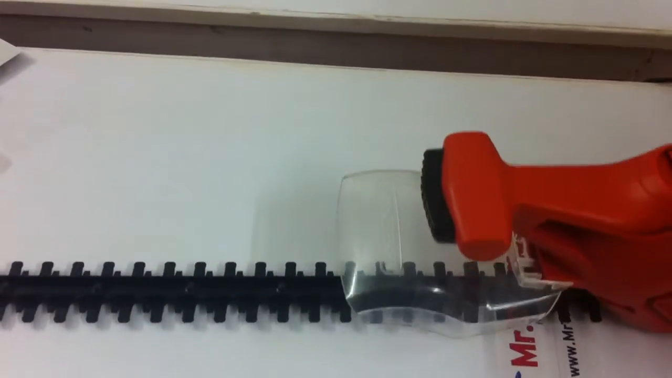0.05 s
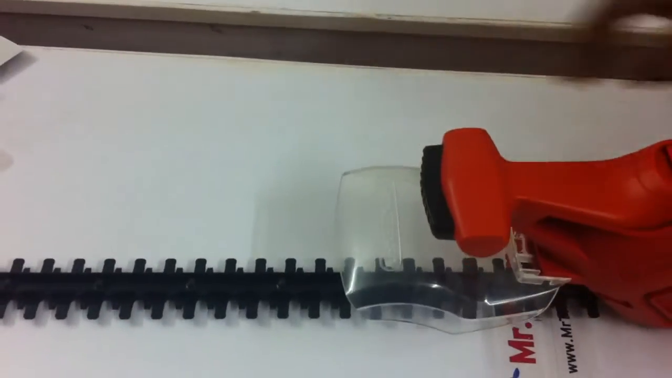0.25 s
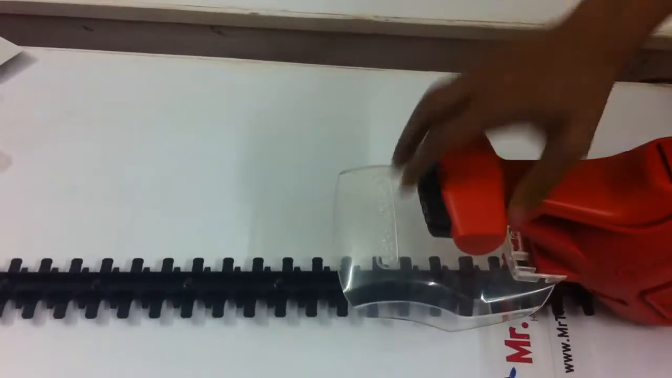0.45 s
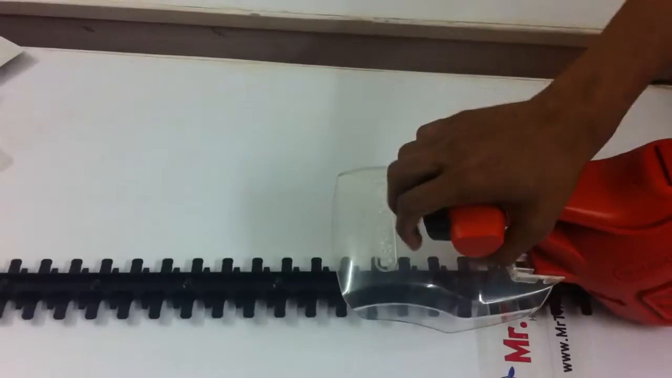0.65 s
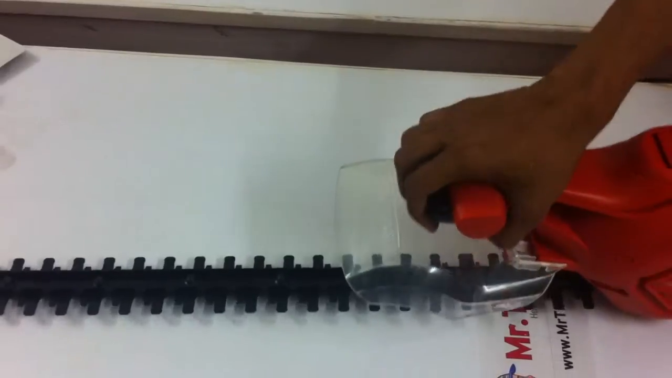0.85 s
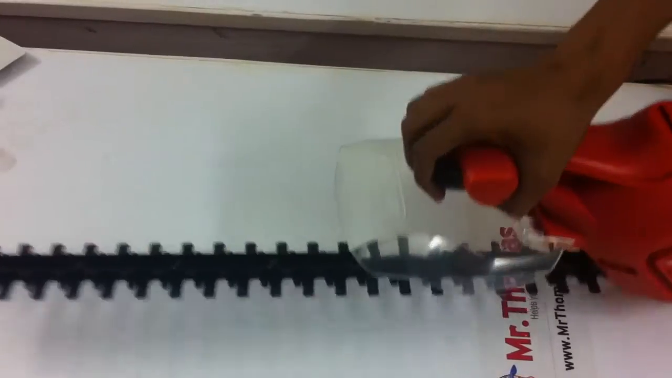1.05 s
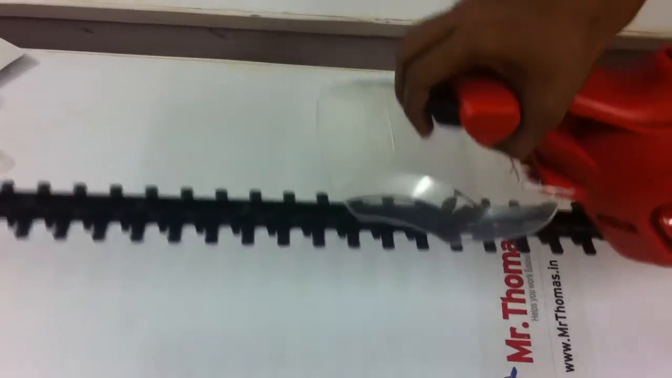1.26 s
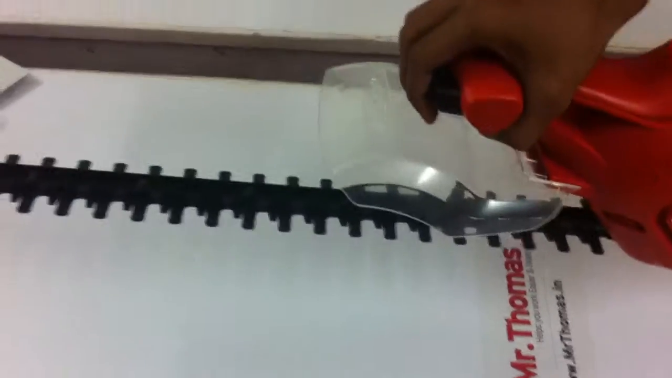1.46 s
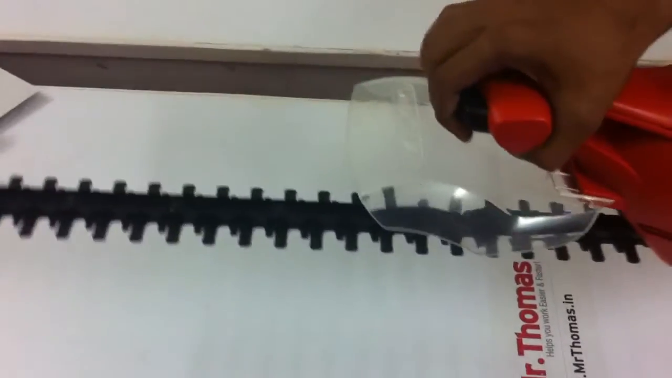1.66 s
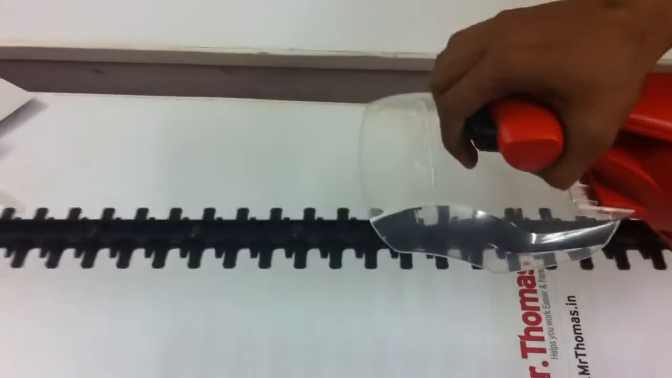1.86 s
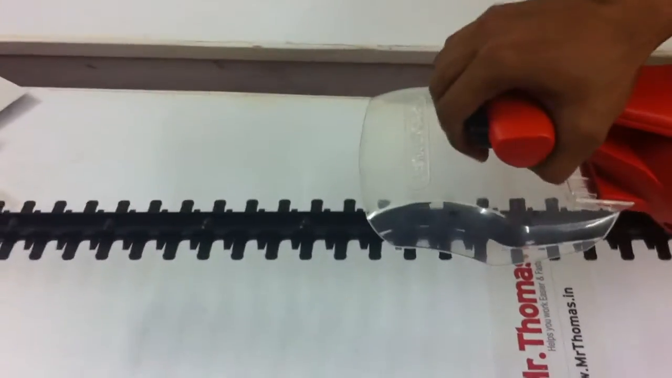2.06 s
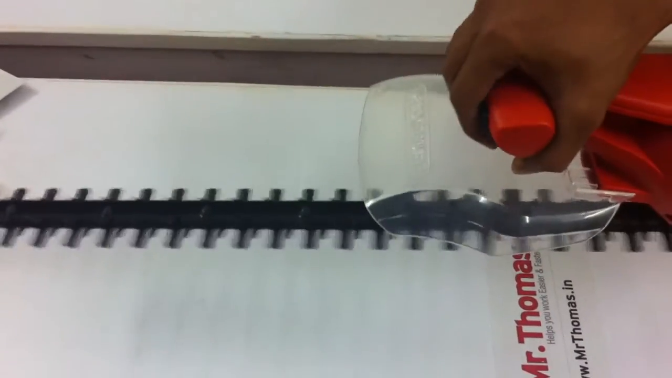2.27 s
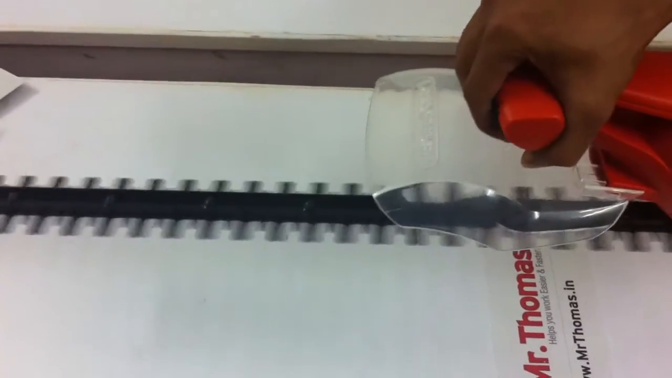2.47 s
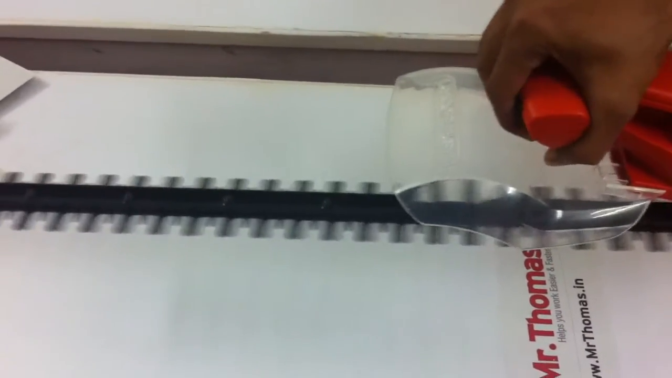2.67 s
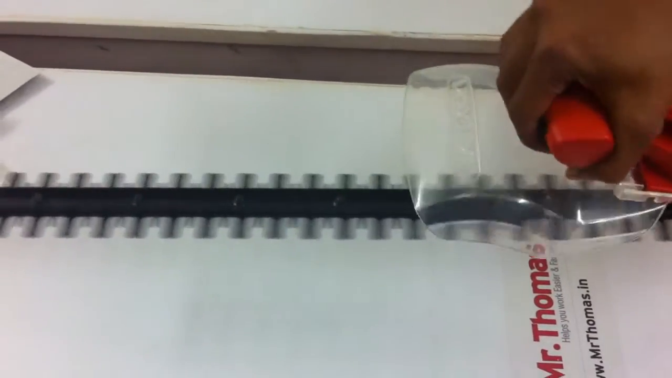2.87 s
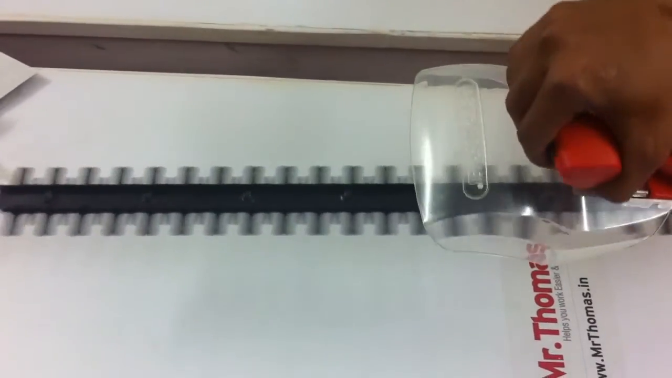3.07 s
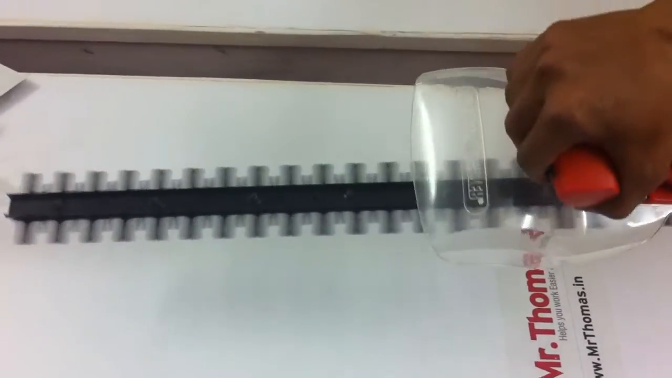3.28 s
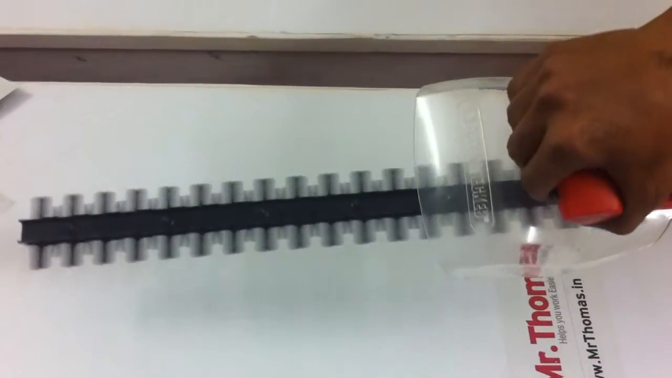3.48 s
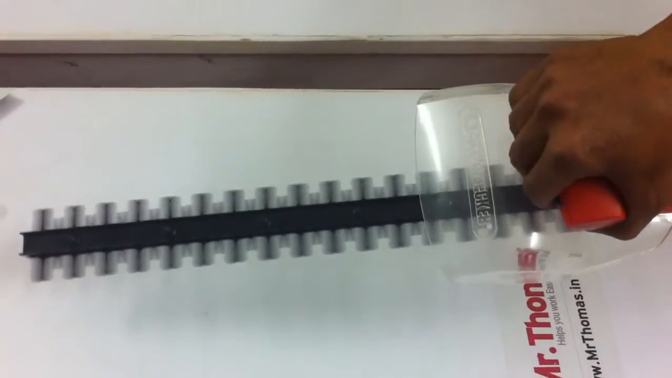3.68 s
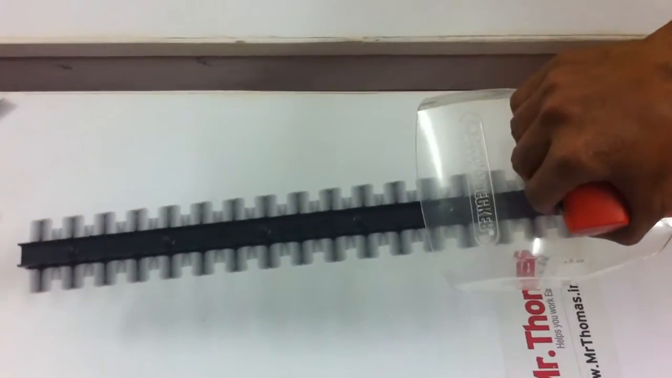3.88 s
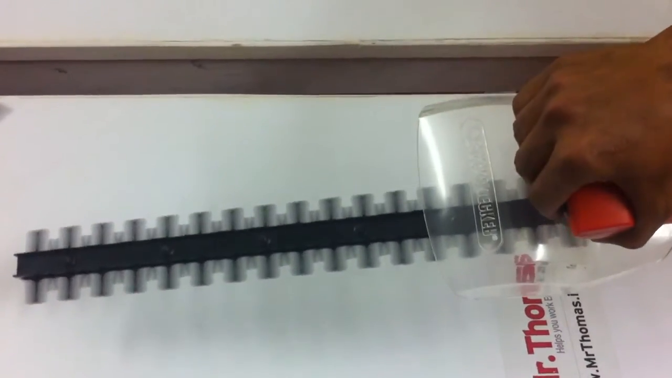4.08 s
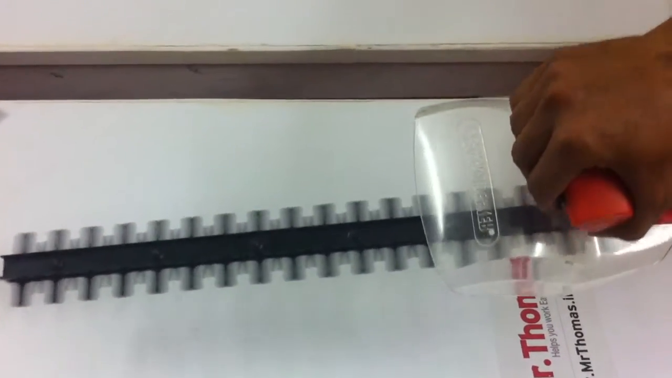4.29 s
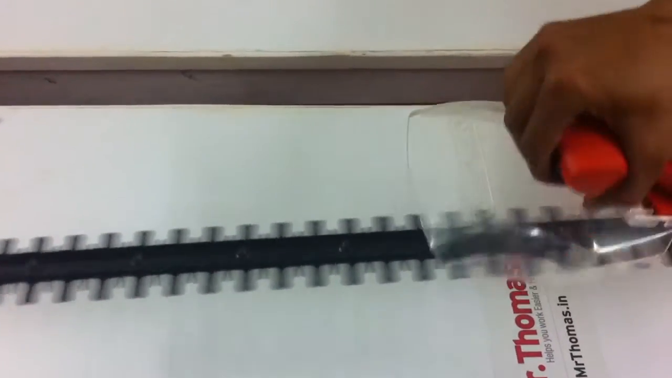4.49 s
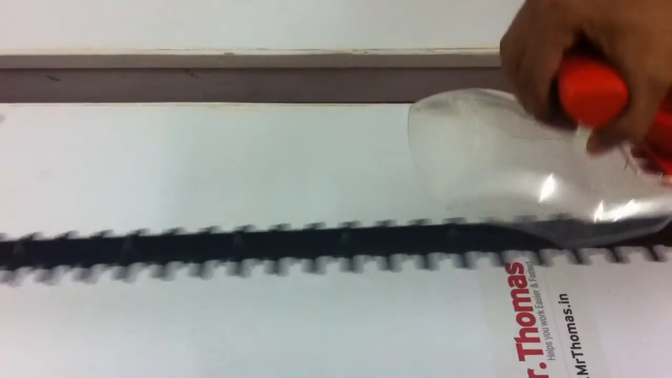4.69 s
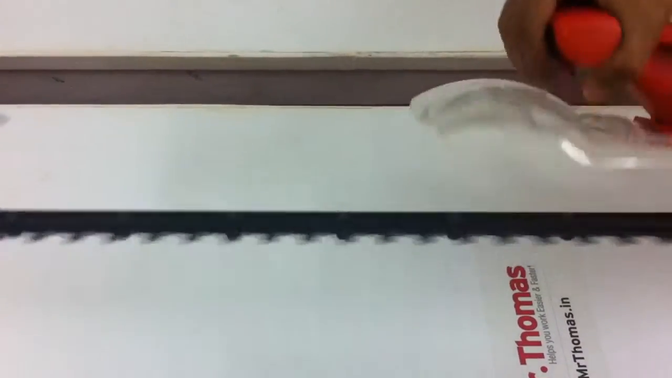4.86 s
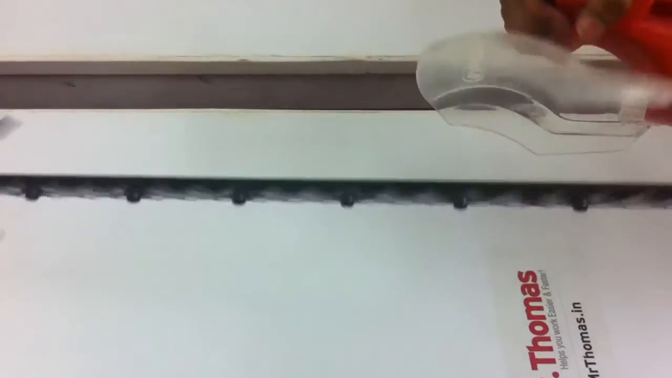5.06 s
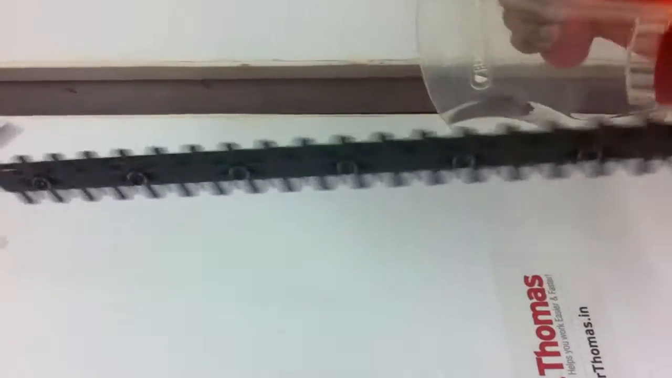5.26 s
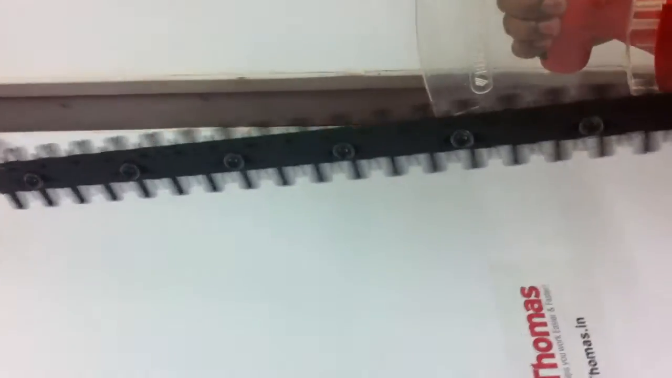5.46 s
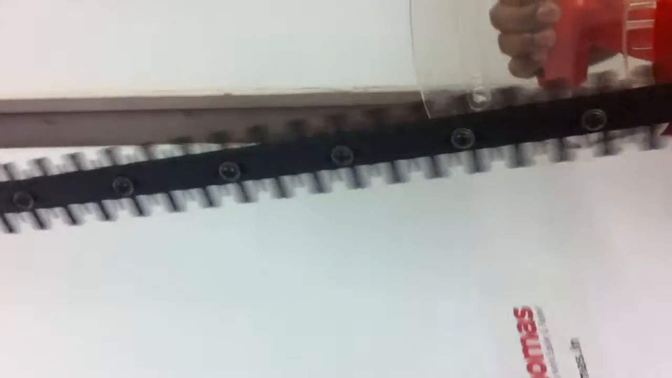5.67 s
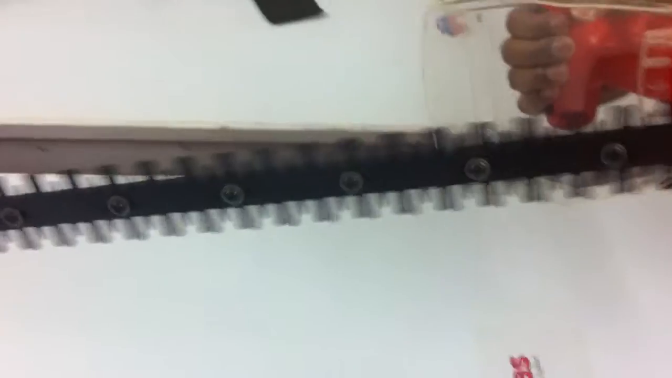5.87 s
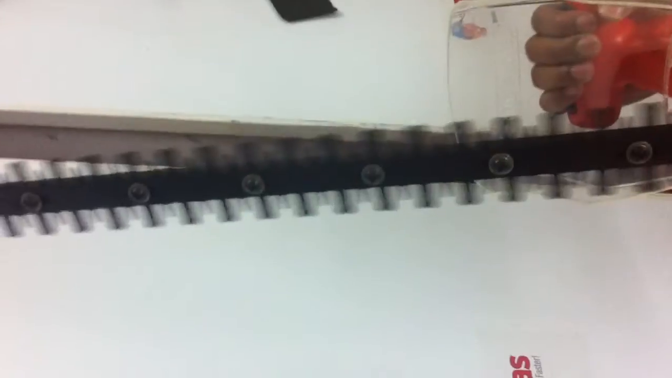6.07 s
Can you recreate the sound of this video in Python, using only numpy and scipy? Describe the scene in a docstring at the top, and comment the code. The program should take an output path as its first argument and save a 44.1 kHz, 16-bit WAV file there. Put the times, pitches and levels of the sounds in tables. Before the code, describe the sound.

Knocks of handling a plastic-bodied power tool, a sharp switch click, then an electric hedge trimmer whines up and runs in a loud, rattling metallic buzz.

```python
"""Electric hedge trimmer in a bare room

Over a dull background rush, a hedge trimmer is picked up from a table with knocks on its shell, and switched on.
Its motor whines up to speed and runs without load: the shaft hums, and lines at multiples of its speed flare.
Filtered noise gives the roar of the fan; random tooth contacts ring the gears, the housing and the blades.
The balance shifts as the tool is turned about; a delayed copy stands for the table's reflection."""
import sys
import numpy as np
from scipy import signal
from scipy.fft import rfft, irfft
from scipy.io import wavfile
from scipy.ndimage import uniform_filter1d, map_coordinates

SR = 44100
rng = np.random.default_rng(int(sys.argv[2]) if len(sys.argv) > 2 else 0)


def dump_mix(stems):
    """Bounce the given channels to the path in sys.argv[1] as a 16-bit WAV at rate SR."""
    frames = np.atleast_2d(stems).T  # one column per channel
    limited = np.clip(frames, -1, 1)  # hard clip at full scale
    pcm = np.round(limited * 32767).astype(np.int16)
    wavfile.write(sys.argv[1], SR, pcm)


N = 270333
TIME = np.arange(N) / SR   # s
START_S, FULL_SPEED_HZ = 2.3442, 449.4   # the motor starts from rest; its free speed in turns per second


def from_db(db):
    """Decibels to amplitude gain, by the definition of the level."""
    return 10 ** (np.asarray(db) / 20)


def rms_one(x):
    """Normalization by the root mean square."""
    return x / np.sqrt(np.mean(x ** 2) + 1e-20)


def in_time(rows):
    """Linear interpolation of a (time, value) curve, sample by sample."""
    times, values = np.transpose(rows)
    return np.interp(TIME, times, values)


def bell(s, half_s):
    """Gaussian rise to 1 at time s, and fall; half_s is its standard deviation."""
    return np.exp(-((TIME - s) / half_s) ** 2 / 2)


def drift(rate):
    """Band-limited random process: splines through random knots, rate of them a second, of spread 1."""
    knots = rng.standard_normal(4096)
    coarse = TIME[::24]
    smooth = map_coordinates(knots, [coarse * rate], order=3, mode="wrap")
    return np.interp(TIME, coarse, rms_one(smooth))


def coloured(x, spectrum):
    """Minimum-phase filtering: the cepstrum of the wanted spectrum, folded causal; unit power gain."""
    size = 8192
    hz, db = np.transpose(spectrum)
    bins_hz = np.arange(size // 2 + 1) * SR / size
    gain = rms_one(from_db(np.interp(np.log(bins_hz + 1), np.log(hz), db)))
    cepstrum = irfft(np.log(gain))
    cepstrum[1:size // 2] *= 2
    cepstrum[size // 2 + 1:] = 0
    response = irfft(np.exp(rfft(cepstrum)))
    return signal.oaconvolve(x, response)[:N]


def resonance(x, hz, width_hz):
    """Damped oscillator as a two-pole filter, with gain 1 on top."""
    r = np.exp(-np.pi * width_hz / SR)
    zeros = np.array([1, 0, -1]) * (1 - r * r) / 2
    poles = [1, -2 * r * np.cos(2 * np.pi * hz / SR), r * r]
    return signal.lfilter(zeros, poles, x)


def modes(x, rows):
    """Modal superposition: each mode, two resonances deep, rings to its own level; the sum has rms 1."""
    total = 0
    for hz, width, db in rows:
        ring = resonance(resonance(x, hz, width), hz, width * 2)
        total = total + from_db(db) * rms_one(ring)
    return rms_one(total)


def room(x):
    """Diffuse reverberation: exponentially decaying noise of unit energy, whose treble dies sooner."""
    t60_s, treble_share = 0.4, 0.58
    t = TIME[:SR]
    white = rng.standard_normal(SR)
    dull = signal.sosfilt(signal.butter(1, 5000, fs=SR, output="sos"), white)
    low_tail = dull * from_db(-60 * t / t60_s)
    high_tail = (white - dull) * from_db(-60 * t / (treble_share * t60_s))
    tail = (low_tail + high_tail) * (t > .004)   # starts after 4 ms
    return signal.fftconvolve(x, tail / np.linalg.norm(tail))[:N]


def ambience(level_db, hum_db, hum_hz, hum_width_hz):
    """Stationary noise: a dull steady rush, with a narrow band of noise as a soft drone."""
    # spectrum of the room's rush: (frequency [Hz], relative density [dB per Hz])
    rush_spectrum = [(15, -50), (25, -31), (33, -40), (70, -26), (89, -28.5), (120, -4.5), (263, 1.5),
                     (293, -2), (326, -0.5), (476, -7.5), (624, -6), (796, -12.5), (1100, -8),
                     (2760, -25.5), (16000, -44.5)]
    rush = rms_one(coloured(rng.standard_normal(N), rush_spectrum))
    drone = rms_one(resonance(rng.standard_normal(N), hum_hz, hum_width_hz))
    return from_db(level_db) * rush + from_db(hum_db) * drone


def table():
    """Free vibration: low modes of the table top swell and decay exponentially after the first knock."""
    # boom of the table top: (frequency [Hz], initial level [dB], t60 [s])
    table_modes = [(85, -52, 0.43), (125, -41.5, 0.41), (167.5, -37, .45), (371, -36, 0.2)]
    swell = 1 - np.exp(-TIME / 0.0036)
    boom = 0
    for hz, db, t60 in table_modes:
        boom = boom + from_db(db - 60 * TIME / t60) * np.sin(2 * np.pi * hz * TIME)
    return swell * boom


def knocks(rows, t60, wet):
    """Impact excitation: short cracks of decaying noise ring the shell's modes and the room."""
    # colour of the crack itself: (frequency [Hz], relative density [dB per Hz])
    crack_spectrum = [(150, -22), (600, -6), (1300, -2), (2400, -5), (3500, -2), (5000, -5), (6500, -3),
                      (9000, -7), (12000, -5), (16000, 0.5)]
    # modes of the plastic shell: (frequency [Hz], width [Hz], gain [dB], raised 0.5 dB below)
    shell_modes = [(2280, 350, -18), (3500, 200, -2), (3900, 130, 4), (4520, 150, 7), (5440, 300, -4),
                   (7200, 300, -5), (7700, 250, -5)]
    direct = np.zeros(N)
    age = TIME[:SR // 5]
    for s, db, bright_hz in rows:
        crack = rng.standard_normal(len(age)) * from_db(db - 60 * age / t60)
        softened = signal.lfilter(*signal.butter(1, bright_hz, fs=SR), crack)
        direct[round(s * SR) + np.arange(len(age))] += softened
    ringing = sum(from_db(db + 0.5) * resonance(direct, hz, width) for hz, width, db in shell_modes)
    return coloured(direct + wet * room(direct), crack_spectrum) + ringing


def handling():
    """Direct and reverberant sound: the hand sets more of the room ringing than the small switch does."""
    # knocks and brushes of the hand: (time [s], crack level before filtering [dB], contact brightness [Hz])
    hand_knocks = [(0.001, -32, 4000), (0.04, -42, 3500), (0.11, -51, 9000), (0.5382, -48, 13000),
                   (0.6472, -33.5, 4500), (0.659, -41, 4000), (0.677, -35, 4000), (0.695, -47, 4000),
                   (0.712, -47, 4000), (1.6526, -50, 4000), (1.9944, -49, 5000)]
    # safety catch and switch: (time [s], crack level before filtering [dB], contact brightness [Hz])
    switch_clicks = [(2.1687, -34.5, 12000), (2.2164, -36.5, 4500), (2.349, -27.5, 14000),
                     (2.354, -19.2, 14000)]
    return knocks(hand_knocks, t60=.026, wet=1.15) + knocks(switch_clicks, t60=0.023, wet=0.51)


def motor_speed():
    """Exponential approach: the gap to the free speed (turns per s) closes quickly, then creeps."""
    spin_up_s, creep_s, creep_share = .1045, .308, .339
    age = np.maximum(TIME - START_S, 0)
    gap = (1 - creep_share) * np.exp(-age / spin_up_s) + creep_share * np.exp(-age / creep_s)
    return FULL_SPEED_HZ * (1 - gap) + 1e-3


def torque(speed):
    """Linear motor law: the share of the stall torque falls to nothing at the free speed."""
    return np.clip(1 - speed / FULL_SPEED_HZ, 0, 1)


def growth(speed, knee, power):
    """Power law: level in dB that grows with the speed up to a knee (turns per s), then holds."""
    return 20 * power * np.log10(np.minimum(speed / knee, 1))


def contacts(speed, stroke, per_turn, spread_db, throb, rub):
    """Random impacts: teeth tap at a rate that peaks once per stroke cycle, over a smooth rubbing."""
    push = np.maximum(1 + throb * np.cos(stroke), 0)   # strongest as the blades reverse
    born = rng.random(N) < per_turn * speed * push / SR
    sizes = from_db(spread_db * np.minimum(rng.exponential(1, N), 3)) * rng.choice([-1, 1], N)
    rubbing = rms_one(rng.standard_normal(N) * np.sqrt(push * speed))
    return rms_one(born * sizes) + rub * rubbing


def part(force, spectrum, level_db):
    """Source and filter: a part colours the force on it, evened in level, and wavers a little on its own."""
    sound = coloured(force, spectrum)
    power = np.abs(uniform_filter1d(sound ** 2, size=6000))
    even = sound / np.sqrt(power + 1e-4)   # about rms 1 at any speed
    return from_db(level_db + 0.46 * drift(40)) * even


def fan_rush(speed, roll):
    """Turbulence noise: the cooling fan's rush grows steeply with the speed."""
    # rush of the cooling fan: (frequency [Hz], relative density [dB per Hz])
    fan_spectrum = [(30, -41), (85, -60), (125, -34), (175, -12.5), (230, -6.5), (290, -4.5), (340, 3.5),
                    (400, 0.5), (470, -5.5), (540, -6), (700, -24), (1500, -70)]
    # swells as the tool passes through the room's standing waves: (time [s], gain [dB])
    fan_swells = [(2.55, 1.2), (2.72, 2.5), (3.3, 2), (3.68, 1), (4.42, 1), (4.72, 1.6)]
    gain_db = -1.8 * roll + sum(db * bell(s, .055) for s, db in fan_swells)
    rush = part(rng.standard_normal(N), fan_spectrum, level_db=-10.6)
    return rush * from_db(growth(speed, knee=285, power=2.8) + gain_db)


def housing_boom(gear, speed, roll):
    """Cavity resonance: the gear contacts drive the hollow motor housing."""
    # hollow motor housing: (frequency [Hz], relative density [dB per Hz])
    housing_spectrum = [(250, -48), (500, -11.5), (620, -0.5), (730, -3), (830, 2), (1100, -1), (1300, -15),
                        (2500, -68.5)]
    # booms as the tool is turned: (time [s], gain [dB])
    housing_swells = [(3.5, 1.5), (4.35, 2), (5.08, 3), (5.5, 4.5), (5.99, 4)]
    gain_db = 3.2 * roll + sum(db * bell(s, .055) for s, db in housing_swells)
    boom = part(gear, housing_spectrum, level_db=-13.4)
    return boom * from_db(growth(speed, knee=360, power=1.56) + gain_db)


def gear_rattle(gear, speed):
    """Structure-borne sound: the gear contacts are radiated by the gearbox in the midrange."""
    # gearbox: (frequency [Hz], relative density [dB per Hz])
    gearbox_spectrum = [(600, -45), (1020, -17.5), (1200, -1.5), (1350, 0), (1550, 2), (1800, 3),
                        (1980, 1.5), (2150, -3), (2400, -6), (2800, -20), (5000, -45)]
    # midrange against the rest: (time [s], gain [dB])
    midrange = [(2.7, 0), (3.25, 0.3), (4.35, -1), (4.6, 0), (5.15, -1.2), (5.5, 0.2), (5.95, 0.7)]
    rattle = part(gear, gearbox_spectrum, level_db=-8)
    return rattle * from_db(growth(speed, knee=330, power=1.0) + in_time(midrange))


def gear_strain(gear, speed):
    """Forced vibration: the starting torque rings the gear case hard, and the ring fades with the torque."""
    # gear case: (frequency [Hz], width of the first resonance [Hz], relative level [dB])
    case_modes = [(1330, 200, 0), (1800, 85, -15), (3320, 150, -0.5), (3870, 200, 5), (6300, 400, 2),
                  (9050, 400, -1)]
    take_up = np.clip((TIME - START_S) / 0.07, 0, 1)   # the gears take up the load in 70 ms
    return from_db(-17.5) * take_up * torque(speed) ** 1.15 * modes(gear, case_modes)


def blade_chatter(blades, speed, roll):
    """Impact and friction noise: steel blades clatter, and hiss as they slide, each in its own band."""
    # clatter of the blades: (frequency [Hz], relative density [dB per Hz])
    clatter_spectrum = [(1500, -69), (2300, -13), (2600, -6.5), (2900, 0), (3450, .5), (3950, -2.5),
                        (4400, -4.5), (5500, -5), (5950, -2), (6750, -2), (7150, -3.5), (7600, -2.5),
                        (8100, -10), (9500, -33.5)]
    # hiss of steel sliding on steel: (frequency [Hz], relative density [dB per Hz])
    hiss_spectrum = [(6500, -43), (8100, -9), (8700, -1), (9800, -1), (10700, -5), (11500, -3.5),
                     (12500, -6), (13200, -2), (13900, -9.5), (14900, -0.5), (15800, -15), (20000, -40)]
    clatter = part(blades, clatter_spectrum, level_db=-1.7)
    clatter = clatter * from_db(growth(speed, knee=353, power=1.63) - 0.3 * roll)
    hiss = part(blades, hiss_spectrum, level_db=-6.8)
    return clatter + hiss * from_db(growth(speed, knee=320, power=1.9) + 3.5 * roll)


def blade_singing(blades):
    """Modal ringing of binding blades: each spell swells, holds and fades linearly in dB."""
    # singing blades: (frequency [Hz], width of the first resonance [Hz], relative level [dB])
    blade_modes = [(1860, 104, 1), (4120, 140, -11), (6430, 450, 0), (7540, 210, 1)]
    # spells of singing: (start of the hold [s], held level [dB], hold [s])
    spells = [(2.54, -24, .19), (5.1, -30, .04)]
    rise_db_per_s, fall_db_per_s = 110, 53
    gain = 0
    for s, db, hold in spells:
        before, after = np.maximum(s - TIME, 0), np.maximum(TIME - s - hold, 0)
        gain = gain + from_db(db - rise_db_per_s * before - fall_db_per_s * after)
    return gain * modes(blades, blade_modes)


def machinery(speed, turns):
    """Superposition of broadband sources: fan, gears and blades, balanced by the roll of the tool."""
    # loudness as the tool is moved about: (time [s], gain [dB])
    loudness = [(2.62, -16), (2.81, -17), (3.16, -15.5), (3.75, -15.5), (3.83, -16.5), (4.74, -15),
                (4.79, -16), (5.37, -16.5), (5.49, -14.5), (5.58, -17.5), (5.93, -15), (6.12, -18.5)]
    # roll that turns vents and blade faces to the listener: (time [s], share of the full roll [0-1])
    roll_curve = [(2.8, 0.26), (3.3, 0.4), (4.1, 0.28), (4.85, 0.43), (5.35, 0.87), (6.1, 0.83)]
    roll = in_time(roll_curve)
    stroke = 2 * np.pi * turns / 6.6   # 6.6 motor turns per cycle of contacts
    gear = contacts(speed, stroke, per_turn=3.0, spread_db=2.3, throb=.22, rub=1.1)
    gear = gear + 0.3 * room(gear)
    blades = contacts(speed, stroke, per_turn=6.0, spread_db=3.0, throb=.11, rub=1.46)
    blades = blades * from_db(0.41 * drift(60))   # the blades bind and loosen
    running = fan_rush(speed, roll) + housing_boom(gear, speed, roll) + gear_rattle(gear, speed)
    running = running + blade_chatter(blades, speed, roll)
    return from_db(in_time(loudness)) * running + blade_singing(blades) + gear_strain(gear, speed)


def table_echo(x, delay_s, sway, strength):
    """Comb filtering: the table mirrors the tool, and the path drifts as the tool sways."""
    lag = delay_s * SR * (1 + sway * drift(2))
    echo = map_coordinates(x, [np.arange(N) - lag], order=1)
    return (x + strength * echo) / np.sqrt(1 + strength ** 2)


def motor_tones(speed, turns, waver_db):
    """Shaft harmonics: lines at multiples of the speed waver as the tool moves through standing waves."""
    # hum of the shaft's unbalance: (time [s], level before wavering and growth [dB])
    hum_curve = [(2.9, -35), (3.3, -32.5), (4.4, -35), (4.8, -39), (5.2, -35.5), (5.8, -32.5),
                 (6.13, -33.5)]
    # third multiple, fan blades and gear mesh: [multiples of the shaft speed]
    shaft_orders = [3, 6, 12.15]
    # flares in standing waves, one list for each order: (time [s], level before wavering and growth [dB])
    flare_lists = [
        [(3.1, -44), (4.1, -41), (5.65, -36.5)],
        [(3.55, -36), (4.3, -40), (5.4, -41)],
        [(4.55, -40)],
    ]
    shaft = 2 * np.pi * turns
    hum_db = in_time(hum_curve) + waver_db * drift(14) + growth(speed, knee=431, power=3.9)
    hum = from_db(hum_db) * np.sin(shaft)
    upper = 0
    for order, flares in zip(shaft_orders, flare_lists):
        gain = from_db(-51) + sum(from_db(db) * bell(s, .22) for s, db in flares)   # -51 between flares
        upper = upper + gain * from_db(waver_db * drift(14)) * np.sin(order * shaft)
    return np.sqrt(2) * (hum + upper * from_db(growth(speed, knee=400, power=3)))


def whine(speed, turns, rough_db, echo, fade_torque):
    """Swept excitation: slot and commutator tones under load flare in each resonance they pass."""
    # motor: (frequency [Hz], width [Hz], peak level before roughness, load and growth [dB])
    motor_modes = [(3270, 240, -24.5), (3820, 340, -23), (6700, 500, -27.5), (9200, 800, -26),
                   (11350, 350, -27.5), (12750, 520, -17.5), (14700, 350, -24.5), (15600, 250, -25)]
    slots, bars = 12, 40   # of the armature and the commutator
    shaken = 2 * np.pi * turns + .012 * drift(370)   # gear backlash jolts the armature
    tones = 0
    for order, flutter in ((slots, .5 * drift(300)), (bars, 0)):
        power = 0
        for hz, width, db in motor_modes:
            detuning = 2 * (order * speed - hz) / width
            power = power + from_db(db) ** 2 / (1 + detuning ** 2)
        rough = from_db(rough_db * drift(160))
        tones = tones + np.sqrt(2 * power) * rough * np.sin(order * shaken + flutter)
    load = np.minimum(torque(speed) / fade_torque, 1) ** 2
    tones = tones * load * from_db(growth(speed, knee=175, power=4.5))
    return tones + echo * room(tones)


def trimmer():
    """Common drive: the switch closes, and one motor speed governs every part of the tool."""
    speed = motor_speed() * (1 + 0.00122 * drift(25))
    turns = np.cumsum(speed) / SR
    switched_on = np.clip((TIME - 2.352) / .012, 0, 1)
    roar = table_echo(machinery(speed, turns), delay_s=.0018, sway=0.213, strength=0.17)
    tones = motor_tones(speed, turns, waver_db=3.2)
    return switched_on * (roar + tones + whine(speed, turns, rough_db=4.3, echo=0.4, fade_torque=.12))


def scene():
    """Linear superposition: all sources reach one microphone, which feeds both channels."""
    background = ambience(level_db=-47.5, hum_db=-57, hum_hz=344, hum_width_hz=40)
    mono = background + table() + handling() + trimmer()
    return np.array([mono, mono])


def record(dry):
    """Soft saturation and band limiting: peaks are rounded; the deepest bass and the very top are cut."""
    top, bass_cut_hz, treble_cut_hz = 1.15, 40, 15850
    rounded = top * np.tanh(dry / top)
    no_bass = signal.sosfilt(signal.butter(2, bass_cut_hz, "high", fs=SR, output="sos"), rounded)
    return signal.sosfilt(signal.ellip(14, .1, 90, treble_cut_hz, fs=SR, output="sos"), no_bass)


dry = scene()
out = record(dry)
dump_mix(out)
```